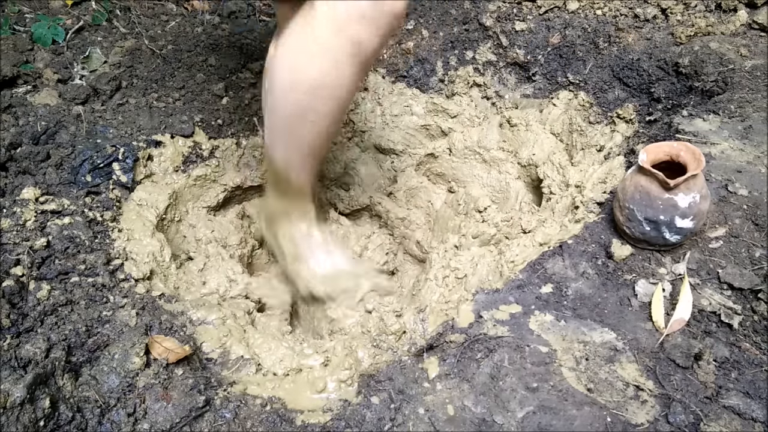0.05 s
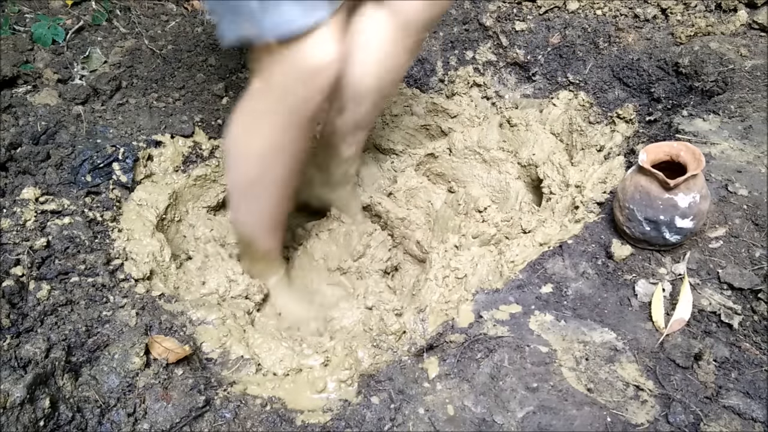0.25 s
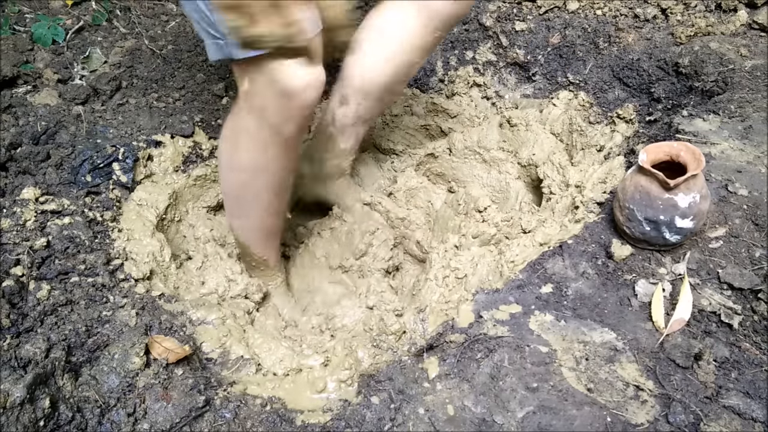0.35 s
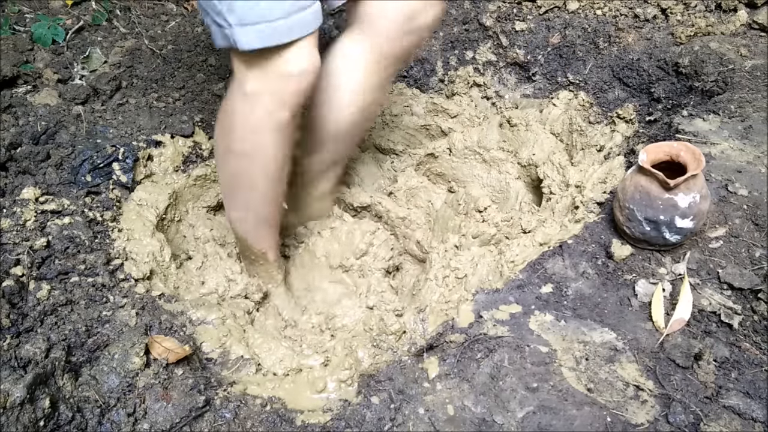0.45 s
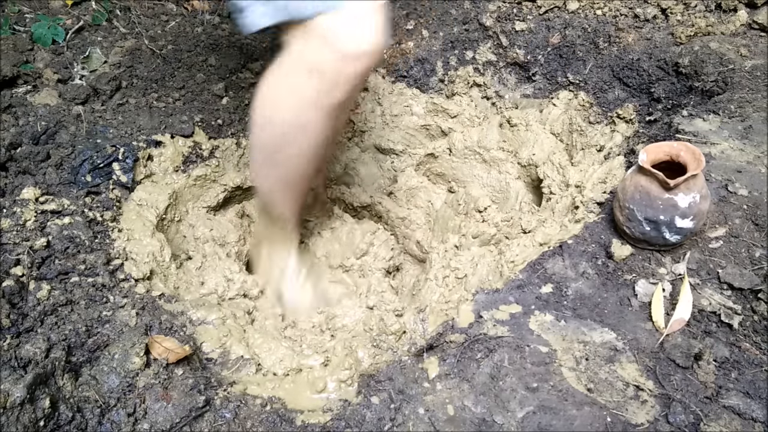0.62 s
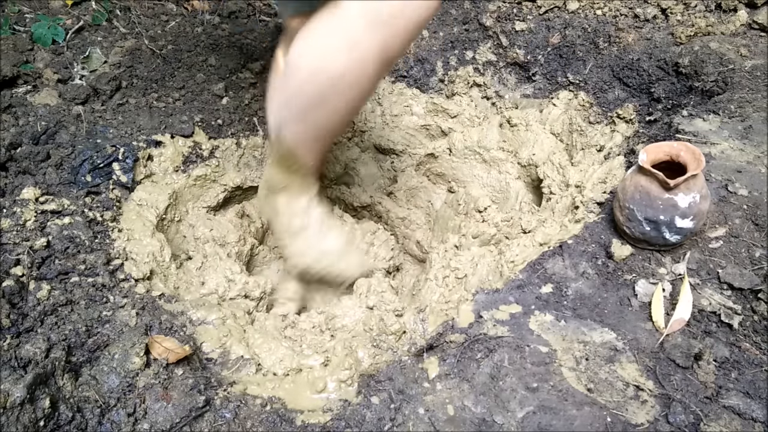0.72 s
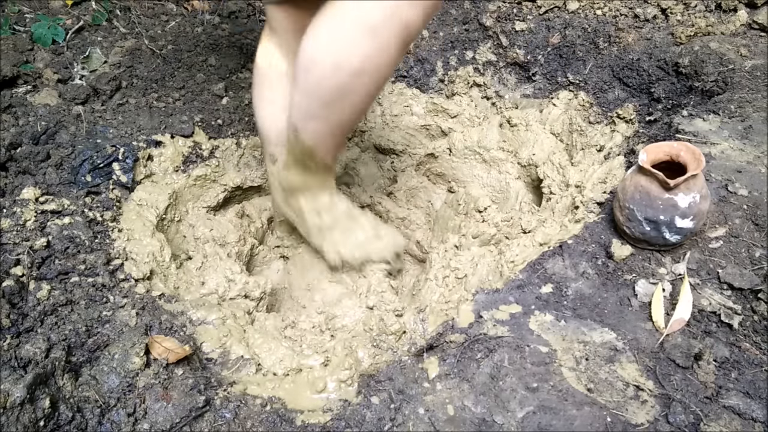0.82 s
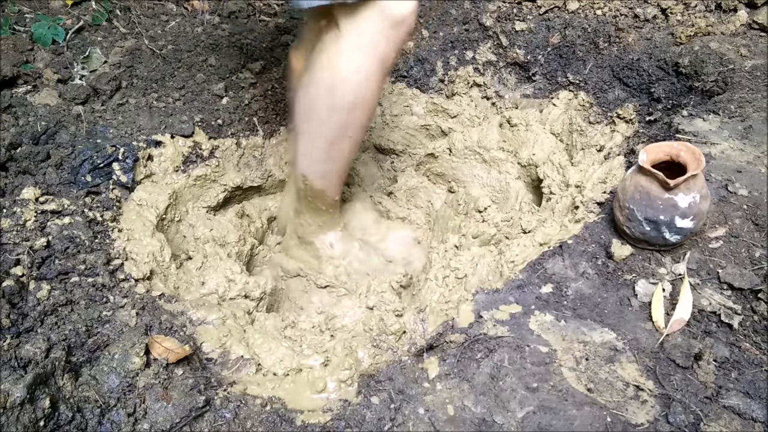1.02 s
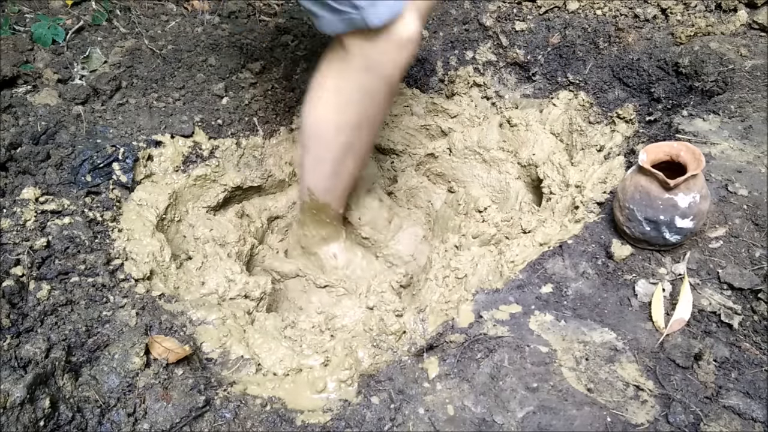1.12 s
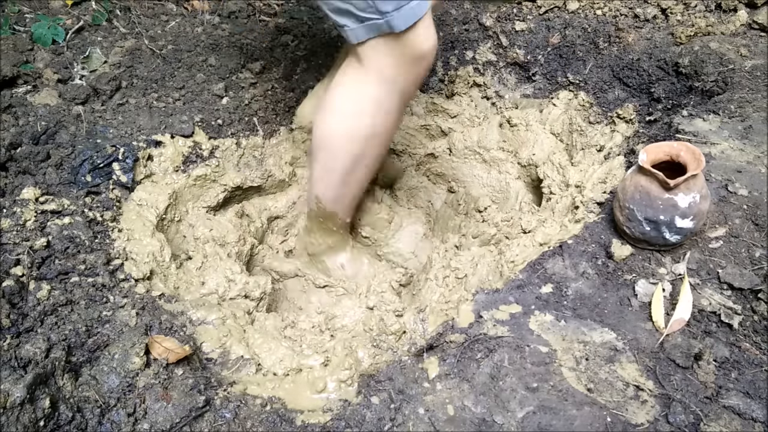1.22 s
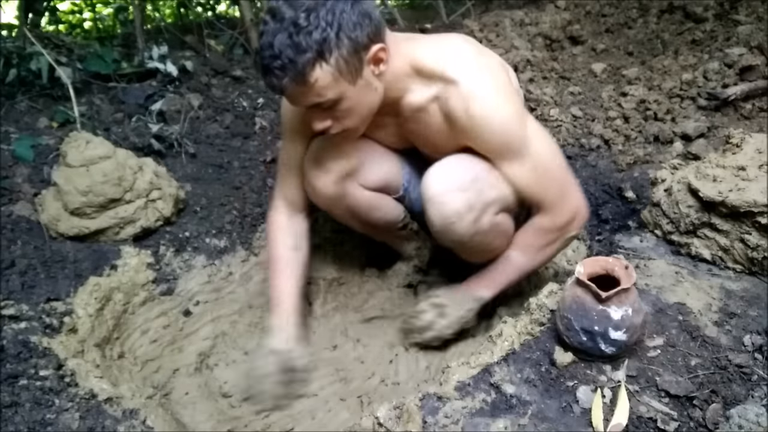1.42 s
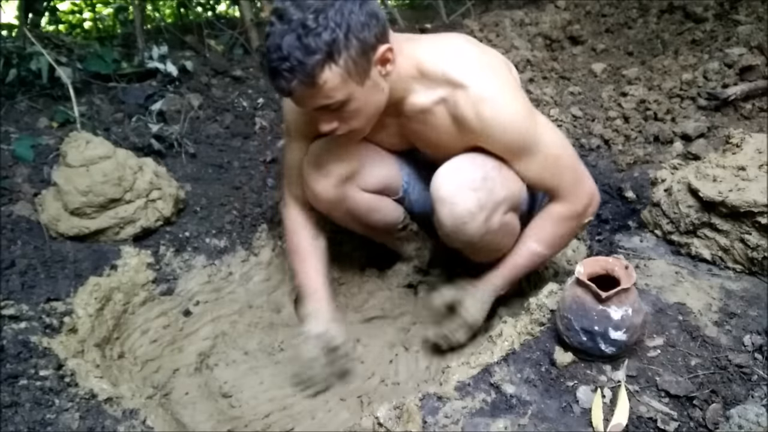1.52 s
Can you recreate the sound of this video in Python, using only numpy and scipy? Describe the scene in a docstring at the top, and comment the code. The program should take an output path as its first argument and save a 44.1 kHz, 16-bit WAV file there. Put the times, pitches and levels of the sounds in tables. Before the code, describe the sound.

Bare feet squelch in wet clay, close by. After a few small wet ticks, two heavy squelches with gulps of air come at about 0.3 and 0.6 seconds. Sticky snaps and bubble pops follow, thickest from 1.0 to 1.2 seconds as a foot peels free. From 1.3 seconds it is quieter, with a hand faintly smearing clay. Low outdoor rumble and thin leaf hiss lie underneath.

```python
"""Bare feet tread wet clay in a wooded hollow: two heavy squelches force out air and slurry, air pockets
gulp, bubbles pop and sticky films snap as the foot peels free. The scene then cuts to a quieter one, where
a hand smears the clay. Heard close, in stereo, over low outdoor rumble and a thin hiss of foliage.
The left microphone is muffled, so the wet treble sits on the right."""
import sys
import numpy as np
from scipy import signal
from scipy.fft import rfft, irfft, next_fast_len
from scipy.io import wavfile
from scipy.ndimage import uniform_filter1d, map_coordinates

SR = 44100
rng = np.random.default_rng(int(sys.argv[2]) if len(sys.argv) > 2 else 0)


def transcribe(u):
    """Save the signal u as a 16-bit wav file named by the first command-line argument.

    u: samples, shape (n,) or (channels, n), limited to [-1, 1]; the rate is SR.
    q: integer samples, one column per channel.
    """
    v = np.clip(np.atleast_2d(u).T, -1, 1)
    q = np.round(v * 32767).astype(np.int16)
    wavfile.write(sys.argv[1], SR, q)


N = 68355
CUT_S = 1.312  # from feet to hand


def amp(db):
    """Decibels to gain."""
    return 10 ** (np.asarray(db) / 20)


def unit(x):
    """Scale to rms 1."""
    return x / np.sqrt(np.mean(x ** 2) + 1e-20)


def along(points, hz):
    """Interpolate (f/Hz, value) points on a log frequency axis."""
    f, v = np.transpose(points)
    return np.interp(np.log(hz + 1), np.log(f + 1), v)


def filtered(x, response):
    """Filter x by a complex function of frequency."""
    n = x.shape[-1]
    m = next_fast_len(n + 4096)
    return irfft(rfft(x, m) * response(np.fft.rfftfreq(m, 1 / SR)), m)[..., :n]


def coloured(x, spectrum):
    """Filter x by (f/Hz, level/dB) points."""
    return filtered(x, lambda hz: amp(along(spectrum, hz)))


def add(track, s, sound):
    """Mix a sound into the track at s seconds."""
    i = round(s * SR)
    track[i:i + len(sound)] += sound[:len(track) - i]


def resonance(f, centre, q):
    """Response of one damped cavity."""
    return 1j * f * centre / q / (centre ** 2 - f ** 2 + 1j * f * centre / q)


def noise_pair(size):
    """Diffuse noise at the two microphones: alike in the bass, unrelated in the treble."""
    # left-right likeness: f/Hz, correlation
    likeness = [(60, 0.95), (150, 0.86), (380, 0.65), (950, 0)]
    turn = lambda hz: np.arccos(np.clip(along(likeness, hz), -1, 1)) / 2
    noise = rng.standard_normal((2, size))
    mid, side = filtered(noise, lambda hz: np.array([np.cos(turn(hz)), np.sin(turn(hz))]))
    return np.array([mid + side, mid - side])


def air(spectrum, db):
    """Low outdoor rumble and a thin hiss of foliage, duller on the left."""
    # left microphone's loss on the ambience: f/Hz, level/dB
    muffling = [(100, 0), (950, -2), (2400, -4.5), (6000, -16), (15000, -8.5)]
    left, right = amp(db) * unit(coloured(noise_pair(N), spectrum))
    return np.array([coloured(left, muffling), right])


def hollow(x):
    """Banks and trees scatter a short bright tail, different from moment to moment."""
    # decay of the tail: f/Hz, t60/s
    decay = [(150, 0.19), (700, 0.042), (2000, 0.13), (6000, 0.16), (15000, 0.23)]
    # colour of the tail: f/Hz, level/dB
    colour = [(150, -15.5), (700, -11), (2000, -7.5), (6000, -7), (15000, -6.5)]
    block, tail_size, rise_s = SR // 5, SR // 3, 0.0024
    out = np.zeros((2, N))
    for i in range(0, N, block):
        hz, t, bands = signal.stft(noise_pair(tail_size), SR, nperseg=256)
        fade = amp(-60 * t / along(decay, hz)[:, None]) * (1 - np.exp(-t / rise_s))
        fade /= np.sqrt(np.mean(fade ** 2, axis=1, keepdims=True) * tail_size)
        tails = signal.istft(bands * fade * amp(along(colour, hz))[:, None], SR, nperseg=256)[1]
        for channel, tail in zip(out, tails):
            add(channel, i / SR, signal.fftconvolve(x[i:i + block], tail))
    return out


def microphones(clay):
    """Sound reaches the muffled left port slightly late, its treble scattered by the camera body."""
    # scattering off the body: f/Hz, share of the power
    scattering = [(500, 0.025), (1000, 0.23), (2000, 0.74), (5000, 1), (12000, 0.36)]
    # left port's response: f/Hz, level/dB
    muffling = [(100, -2.5), (450, -0.5), (1200, -1.5), (2000, -2.5), (3300, -11), (5500, -17), (9000, -21),
                (15000, -16)]
    lag_s, scatter_s = 0.00014, 0.00015
    left_tail, right_tail = hollow(clay)
    t = np.arange(SR // 200) / SR
    body = rng.standard_normal(len(t)) * np.exp(-t / scatter_s)
    blurred = signal.fftconvolve(clay, body / np.linalg.norm(body))[:N]
    share = lambda hz: np.clip(along(scattering, hz), 0, 1)
    scattered = filtered(blurred, lambda hz: np.sqrt(share(hz)))
    direct = filtered(clay, lambda hz: np.sqrt(1 - share(hz)) * np.exp(-2j * np.pi * hz * lag_s))
    return np.array([coloured(direct + scattered + left_tail, muffling), clay + right_tail])


def grains(spectrum, per_s=3200, spread_db=7.5, hiss=0.56):
    """Countless tiny wet ticks of uneven size over a soft hiss, rms 1."""
    ticks = (rng.random(N) < per_s / SR) * np.sign(rng.standard_normal(N))
    ticks *= amp(spread_db * np.clip(rng.standard_normal(N), -2, 2))
    return unit(coloured(unit(ticks) + hiss * rng.standard_normal(N), spectrum))


def sliding(clumps_per_s=140, clump_db=2.3):
    """Wet clay crackles in clumps and churns as skin sticks and slips through it."""
    # clay sliding on skin: t/s, crackle level/dB, churn level/dB
    slide = [(.0, -63.5, -64.5), (.16, -60, -60), (.21, -47.5, -56), (.28, -57.5, -60), (.35, -44, -63),
             (.42, -76, -67.5), (0.573, -61.5, -62.5), (0.589, -39.5, -47), (.625, -38, -50),
             (.648, -49.5, -58.5), (0.709, -45, -56), (.78, -62, -77.5), (.92, -70, -63),
             (1.01, -53.5, -58.5), (1.03, -40, -52), (1.085, -46.5, -50), (1.132, -44.5, -50),
             (1.21, -52.5, -63), (1.30, -74, -87), (1.43, -72, -81), (1.484, -58, -87), (1.55, -68.5, -84)]
    # colours of the bright crackle and the low churn: f/Hz, level/dB
    crackle_colour = [(500, -21.5), (1500, -15), (3000, -9.5), (6500, -5.5), (10000, -13.5), (16000, -19.5)]
    churn_colour = [(80, -12), (200, -5), (600, -2), (1100, -5), (2500, -9.5), (5000, -13.5)]
    s, crackle_db, churn_db = np.transpose(slide)
    t = np.arange(N) / SR
    crackle = amp(np.interp(t, s, crackle_db)) * grains(crackle_colour)
    churn = amp(np.interp(t, s, churn_db)) * grains(churn_colour)
    clumps = map_coordinates(rng.standard_normal(N // 64), [t * clumps_per_s])
    return amp(clump_db * clumps) * crackle + churn


def burst(source, db, centre, q):
    """A short excitation heard through a small cavity in the clay; db is its energy spread over 1.5 ms."""
    lowest = centre * 0.48 * min(q, 1)
    low_cut = lambda f: resonance(f, lowest, 1) * 1j * f / lowest
    sound = filtered(source, lambda f: resonance(f, centre, q) ** 2 * low_cut(f))
    return amp(db) * sound * np.sqrt(0.0015 * SR / np.sum(sound ** 2))


def pops(spatter_db=-16, spatter_s=0.0012):
    """A small bubble bursts all at once: one sharp click and a trace of spatter."""
    # bursting bubbles: t/s, level/dB, centre f/Hz, Q
    bubbles = [(0.1059, -30.5, 7620, 2.1), (0.52, -28, 8550, 0.69), (0.6123, -21.5, 3330, .8),
               (1.1055, -31, 8200, .8), (1.1287, -25.5, 6900, 4), (1.2672, -23, 5220, 1.64)]
    out, t = np.zeros(N), np.arange(SR // 100) / SR
    for s, db, centre, q in bubbles:
        spatter = amp(spatter_db) * np.exp(-t / spatter_s) * rng.standard_normal(len(t))
        add(out, s, burst((t == 0) + spatter, db, centre, q))
    return out


def snaps(crack_db=-3, fade_cycles=4, spray_db=1, spray_cycles=14):
    """Each film tears with a crack and a wisp of spray: the smaller its cavity, the shorter."""
    # snapping films of clay: t/s, level/dB, centre f/Hz, Q
    films = [(0.1764, -37, 5500, 0.32), (0.201, -36.5, 7500, 1), (.229, -28, 6560, 1.06),
             (0.231, -31.5, 5130, 1), (0.2457, -33.5, 6500, 0.2), (0.294, -35, 8800, 1.4),
             (0.564, -37, 7640, 1.4), (0.5935, -27.5, 8000, 0.91), (0.609, -23.5, 3100, 1.4),
             (0.6247, -31, 5500, 1.5), (0.632, -31.5, 6940, 0.85), (0.661, -35.5, 7200, 1.2),
             (0.678, -34.5, 5600, 1.2), (0.6909, -22, 4580, 0.92), (.697, -30, 2750, 0.73),
             (0.704, -31.5, 6450, 0.6), (0.7288, -30.5, 2220, 1.15), (.910, -41.5, 8200, 2.6),
             (.942, -36, 2640, 0.7), (0.9656, -34, 2400, 0.98), (0.9691, -33, 6140, 1.7),
             (.998, -37.5, 3270, 0.62), (1.0193, -29, 4040, 0.9), (1.033, -28, 4360, 0.65),
             (1.046, -28.5, 6600, 2.8), (1.0654, -28, 7850, 2.8), (1.0664, -32, 2950, 1.1),
             (1.1179, -24.5, 5100, 0.93), (1.120, -24, 5870, 3.3), (1.1295, -29, 6650, 2.6),
             (1.165, -37, 7300, 1.2), (1.1697, -27.5, 7000, 1.5), (1.2344, -34.5, 2880, 0.7),
             (1.505, -47, 6400, 1.1)]
    out, t = np.zeros(N), np.arange(SR // 30) / SR
    for s, db, centre, q in films:
        cycles = t * centre
        fade = np.exp(-cycles / fade_cycles) + amp(spray_db) * np.exp(-cycles / spray_cycles)
        tear = amp(crack_db) * (t == 0) + fade * rng.standard_normal(len(t))
        add(out, s, burst(tear, db, centre, q))
    return out


def pockets(attack_s=0.00066, waver_depth=0.0038, puff_db=-12.5, puff_s=0.003):
    """Trapped air escapes with a dull puff and rings briefly, its pitch unsteady as the soft walls move."""
    # air pockets under the foot: t/s, level/dB, f/Hz, t60/s
    cavities = [(.117, -32.5, 495, 0.0037), (.212, -42.5, 808, 0.027), (0.32, -27.5, 228, 0.051),
                (0.321, -15, 2710, 0.01), (0.331, -39.5, 64, 0.13), (.322, -26, 410, 0.022),
                (.324, -24.5, 710.4, 0.068), (.326, -28, 856, 0.053), (.328, -27, 1054, 0.039),
                (0.339, -29, 1385, 0.018), (.323, -33.5, 2600, 0.039), (.585, -36.5, 710, 0.035),
                (.607, -36.5, 248, 0.078), (.608, -26.5, 531, 0.04), (.607, -26.5, 850, 0.065),
                (0.607, -31, 1052, 0.06), (.609, -19, 1902, 0.03), (0.611, -28.5, 3060, 0.1),
                (0.6903, -27.5, 1115, 0.012), (0.729, -26.5, 488, 0.0094), (.730, -33, 1990, 0.034),
                (.730, -34, 3955, 0.036), (.942, -36, 590, 0.013), (0.967, -35, 513, 0.011),
                (1.046, -32, 614, 0.025), (1.066, -38, 526, 0.021), (1.079, -38, 516, .011),
                (1.0922, -23, 860, 0.0083), (1.093, -36, 360, 0.022), (1.118, -30.5, 1030, 0.016),
                (1.165, -30.5, 520, 0.0054), (1.209, -35.5, 1380, 0.0068)]
    out, t = np.zeros(N), np.arange(SR // 6) / SR
    for s, db, hz, t60 in cavities:
        waver = unit(uniform_filter1d(rng.standard_normal(len(t)), size=128))
        pitch = hz * (1 + waver_depth * waver)
        ring = amp(-60 * t / t60) * np.sin(2 * np.pi * np.cumsum(pitch) / SR)
        rush = filtered(rng.standard_normal(len(t)), lambda f: resonance(f, 0.44 * hz, q=0.66) ** 2)
        puff = amp(puff_db) * np.exp(-t / puff_s) * unit(rush)
        add(out, s, amp(db) * (1 - np.exp(-t / attack_s)) * (ring + puff))
    return out


def gulp(peak_s=0.328, width_s=0.0025, db=-33.5, mid_hz=650, octaves_per_s=72):
    """The first tread squeezes a large air pocket: its pitch shoots up as it shrinks."""
    t = np.arange(N) / SR - peak_s
    hz = mid_hz * 2 ** np.clip(octaves_per_s * t, -2, 2)
    swell = amp(db) * np.exp(-0.5 * (t / width_s) ** 2)
    return swell * np.sin(2 * np.pi * np.cumsum(hz) / SR)


def squelches():
    """The foot's weight bears down: a quick swell of pressure squirts slurry and spray from the sole."""
    # treads: full pressure at t/s, rise/s, hold/s, fade/s, slurry level/dB, spray level/dB
    treads = [(0.3225, 0.0033, 0.0075, 0.005, -33.5, -30), (0.6084, 0.0037, 0.0031, 0.009, -36, -29)]
    # colours of the thick slurry and the fine spray: f/Hz, level/dB
    slurry = [(55, -45), (110, -19), (200, -4), (330, -11), (600, 2), (1200, -15), (2000, -1.5),
              (3500, -6.5), (8000, -30)]
    spray = [(300, -61), (1200, -5.5), (2500, -24), (4000, -6.5), (7000, -6), (10000, -10), (16000, -20)]
    out, t = np.zeros(N), np.arange(N) / SR
    for s, rise, hold, fade, slurry_db, spray_db in treads:
        pressure = np.exp(np.minimum(t - s, 0) / rise - np.maximum(t - s - hold, 0) / fade)
        out += pressure * (amp(slurry_db) * grains(slurry) + amp(spray_db) * grains(spray))
    return out


def scene():
    """Feet tread the clay up to the cut, a hand smears it afterwards, each in its own ambience."""
    # ambience behind the feet and behind the hand: f/Hz, level/dB
    treading_air = [(25, -37), (42, -4.5), (58, 5), (85, -3.5), (180, -8.5), (350, -14.5), (800, -14.5),
                    (1500, -20.5), (3200, -21), (6500, -16.5), (10000, -25)]
    smearing_air = [(25, -10), (60, 11.5), (95, -4), (200, 2), (400, -13), (1000, -14), (3000, -24.5),
                    (6500, -17.5), (10000, -22.5), (16000, -21.5)]
    # colour of the hand's thin scrape: f/Hz, level/dB
    scrape = [(2000, -9.5), (5500, 0)]
    clay = snaps() + pops() + pockets() + gulp() + squelches() + sliding()
    before_cut = np.arange(N) / SR < CUT_S
    treading = microphones(clay) + air(treading_air, db=-58.5)
    smearing = microphones(coloured(clay * ~before_cut, scrape)) + air(smearing_air, db=-61)
    return np.where(before_cut, treading, smearing)


def record(dry):
    """The camera drops the deepest rumble and keeps nothing above its band limit."""
    low_cut_hz, top_hz = 43, 16100
    return filtered(dry, lambda hz: (hz < top_hz) * hz ** 2 / np.hypot(hz ** 2, low_cut_hz ** 2))


dry = scene()
out = record(dry)
transcribe(out)
```